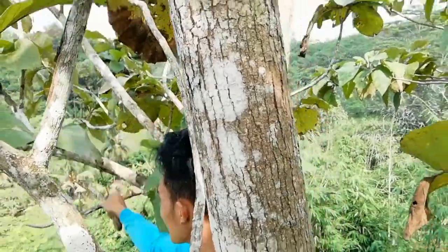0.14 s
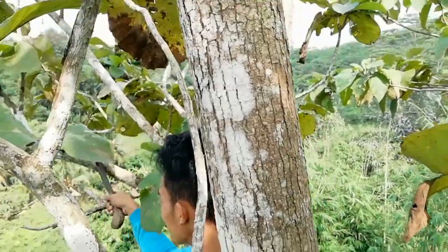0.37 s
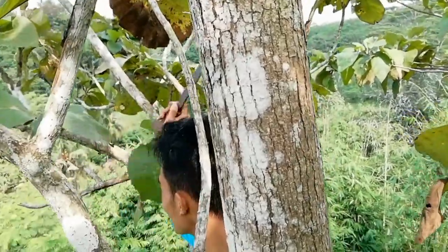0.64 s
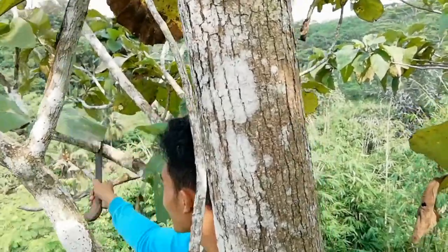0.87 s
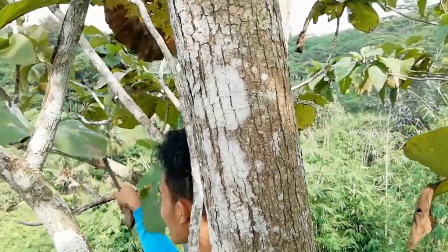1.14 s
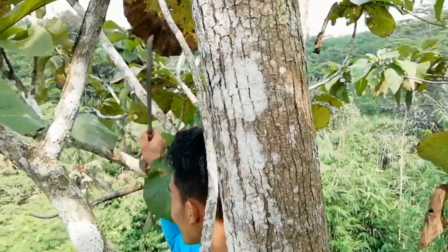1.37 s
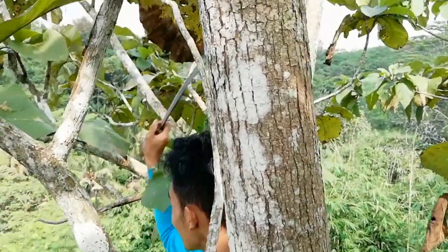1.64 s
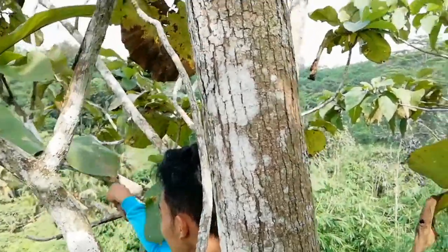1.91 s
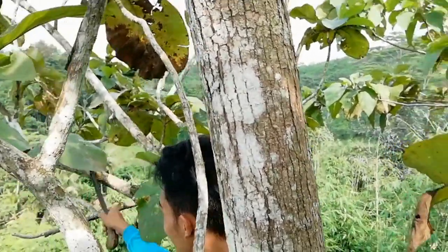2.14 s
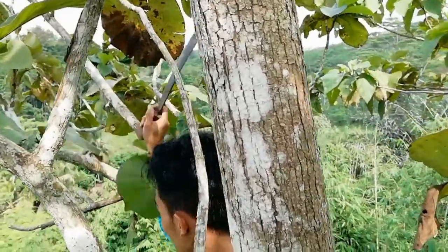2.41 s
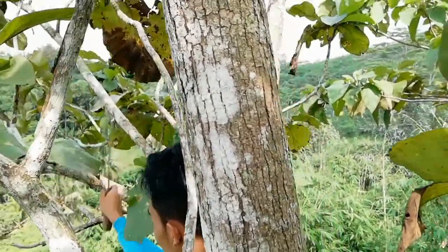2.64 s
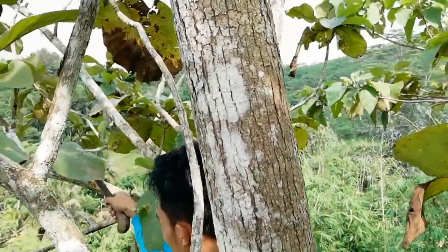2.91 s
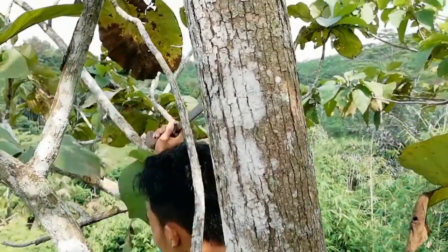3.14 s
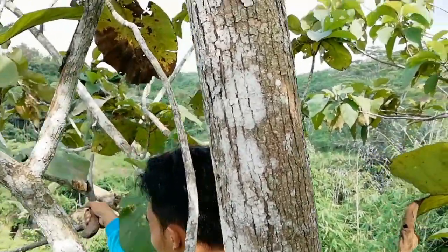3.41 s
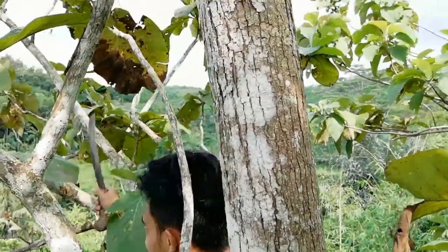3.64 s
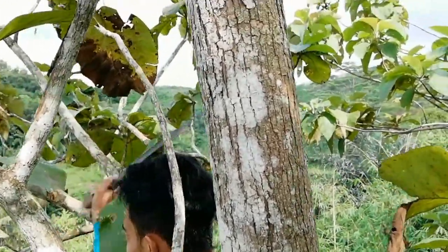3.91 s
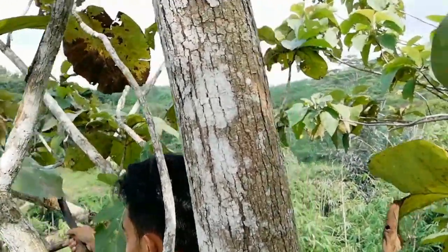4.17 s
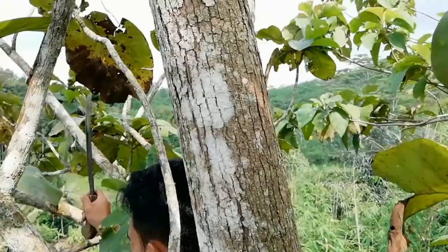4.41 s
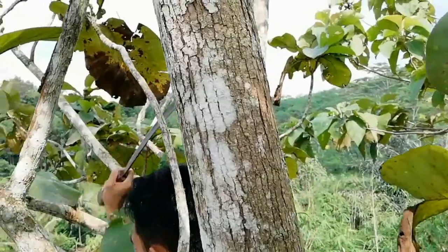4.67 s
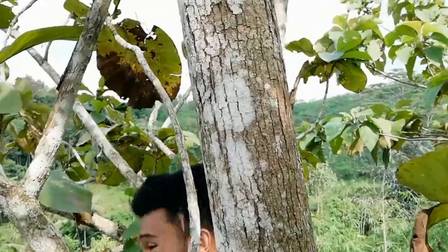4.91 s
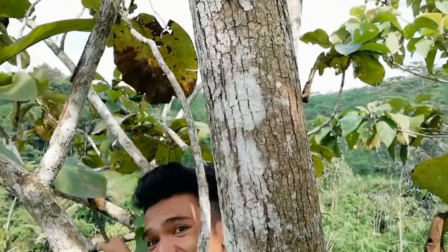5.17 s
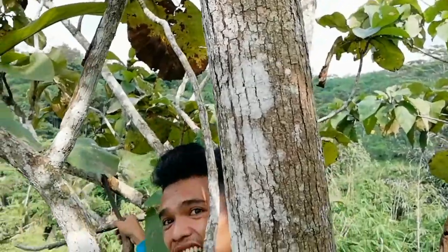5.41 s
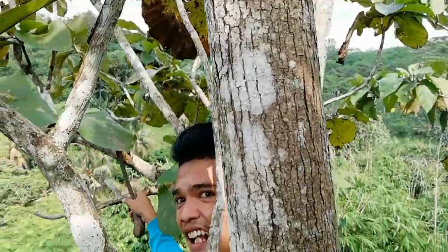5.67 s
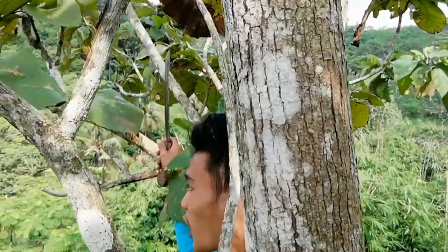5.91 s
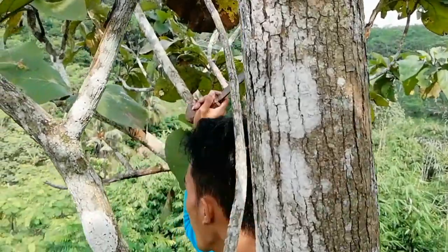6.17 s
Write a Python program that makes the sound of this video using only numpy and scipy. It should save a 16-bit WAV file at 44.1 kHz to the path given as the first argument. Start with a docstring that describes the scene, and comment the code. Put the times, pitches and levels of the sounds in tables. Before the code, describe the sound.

Outdoors beside a tree, a blade chops a thick branch at about 0.24, 0.95, 1.83, 2.79, 3.46, 4.10 and 4.88 s. The first, third and last are the fullest, with a hard woody crack and a short hollow ring; the second, fifth and sixth are thinner, drier and more splintery, the fourth in between. Every blow shakes the leaves, with a quick rustling shudder, a slower settling and a soft low thud. Twigs snap and leaves brush between them, notably around 0.55, 1.53, 2.38 and 3.40 s. After the last chop come small crackles near 5.2 to 5.5 s and faint ones near 6 s. Throughout, a distant small engine putters low, swelling and fading, beneath quiet air and breeze-stirred leaves. A very high thin insect whine continues with tiny gaps until 6 s, with a few barely audible breathy chirps. Close, dry stereo, peaks clipped.

```python
"""A small engine putters far below, an insect whines very high and leaves stir; then twigs snap and a
blade chops at a thick branch high in a tree. Chops excite damped modes and filtered grain noise;
twigs are pressure pulses with short rings, leaves and wind are coloured noise, the engine is a train
of filtered pulses, and insect and chirps are narrowband tones. Two spaced microphones set the image."""
import sys
import numpy as np
from scipy import signal
from scipy.fft import rfft, irfft
from scipy.io import wavfile
from scipy.ndimage import uniform_filter1d

SR = 44100
rng = np.random.default_rng(int(sys.argv[2]) if len(sys.argv) > 2 else 0)


def transcribe(signal):
    """Save signal, clipped to [-1, 1], as a 16-bit WAV file at the path in sys.argv[1]."""
    frames = np.atleast_2d(signal).T
    limited = np.clip(frames, -1, 1)
    pcm = np.round(limited * 32767).astype(np.int16)
    wavfile.write(sys.argv[1], SR, pcm)


def voltage_ratio(level):
    """Linear amplitude factor for a level in decibels (scalar or array-like)."""
    return 10 ** (np.asarray(level, float) / 20)


N = 277830
T = np.arange(N) / SR  # t/s

# blows, relative levels: (t/s, deep ring/dB, high ring/dB, edge bite/dB, splinter fizz/dB)
CHOPS = [(0.238, 6, 1.5, -18, -6.5), (0.954, -14.5, -8.5, -3.5, -1), (1.834, 6.5, 3, -35, -3),
         (2.79, -2.5, -7.5, -10.5, -1), (3.458, -13, -5, -4, -3.5), (4.098, -9, -3.5, -5, 0),
         (4.884, 3, 2.5, -15, -1)]
# blade brushing through leaves, relative levels: (middle t/s, half length to 1/e/s, knock/dB, scrape/dB, fizz/dB)
BRUSHES = [(0.227, 0.0062, -35, -28, -39), (0.586, 0.026, -38.5, -39, -44), (0.738, 0.016, -57, -42, -51),
           (0.854, 0.017, -50, -37, -41), (0.906, 0.019, -45, -33, -25), (1.364, 0.022, -38.5, -37.5, -39),
           (1.557, 0.033, -35.5, -34, -36), (1.642, 0.063, -43.5, -37, -40), (2.399, 0.018, -37, -38, -46),
           (2.568, 0.034, -48, -47, -44.5), (3.08, 0.023, -41, -37, -38), (3.355, 0.014, -56, -39.5, -35.5),
           (3.375, 0.0056, -34, -35, -23), (3.404, 0.027, -45, -32, -28), (3.998, 0.012, -47, -52, -42),
           (4.048, 0.026, -41.5, -36, -29), (4.412, 0.022, -43.5, -41.5, -43),
           (5.5, 0.042, -52, -40.5, -49.5), (6.154, 0.098, -53, -49.5, -50)]
# twig snaps, relative levels: (t/s, ring f/Hz, woody knock/dB, scrape/dB, leafy fizz/dB)
SNAPS = [(0.092, 775, -44, -58, -75), (0.2223, 1690, -31, -33.5, -17.5), (0.556, 1990, -34, -29.5, -31),
         (0.563, 1830, -27, -27.5, -27.5), (0.709, 1590, -26, -47, -22.5), (0.742, 1170, -51, -40, -39),
         (0.854, 1110, -54, -47, -33.5), (0.884, 1620, -45, -50, -26), (1.19, 802, -65, -42, -21),
         (1.395, 1110, -37.5, -44.5, -38), (1.523, 1560, -23, -25.5, -24.5),
         (1.543, 1490, -19.5, -24.5, -32.5), (1.659, 2100, -28.5, -31, -32), (2.15, 1930, -45, -43, -43),
         (2.376, 2110, -28.5, -27.5, -23), (2.384, 1180, -37, -26, -36), (2.395, 910, -46, -27, -26.5),
         (2.509, 1340, -40.5, -38.5, -42), (2.731, 1940, -35.5, -43, -47), (3.047, 2150, -34, -30.5, -33.5),
         (3.068, 1980, -44, -44, -60), (3.209, 1140, -49.5, -40, -42), (3.376, 1550, -59, -54, -36),
         (3.388, 2100, -55, -43, -26), (3.4, 2160, -38.5, -24, -13), (3.514, 900, -30, -41, -45),
         (3.546, 2070, -37, -28, -25), (3.554, 1300, -39, -28.5, -33), (3.88, 1780, -43, -37, -34.5),
         (3.984, 1130, -46.5, -39, -40), (4.39, 1630, -40, -32, -33.5), (5.145, 1480, -34, -35, -38),
         (5.214, 1520, -47, -41, -50), (5.265, 1500, -35.5, -46, -57), (5.409, 840, -33, -38.5, -42.5),
         (5.443, 770, -32.5, -33, -38), (5.456, 1490, -37.5, -42, -50), (5.968, 727, -49, -39, -45.5)]
# leaves stirring in the breeze: (t/s, level/dB)
LEAVES = [(0, -52.5), (.7, -48), (1.3, -48.5), (2, -50.5), (2.5, -49.5), (3.2, -50), (4.3, -49.5),
          (5.07, -50), (5.74, -53.5), (6.3, -58.5)]
# modes of the branch before each blow's weighting: (f/Hz, relative level/dB, t60/s)
BRANCH = [(120, -20.5, 0.15), (153.6, -12.5, 0.23), (205.4, -12, 0.27), (281, -12, 0.14), (352.8, -5, 0.14),
          (428, -7.5, 0.088), (525, -14, 0.18), (611, 2, 0.048), (769, -6.5, 0.11), (878, -1.5, 0.082),
          (1043, -6, 0.1), (1178, -10.5, 0.17), (1340, 2, 0.033), (1480, -3, 0.063), (1620, 4.5, 0.033),
          (1810, 0.5, 0.038), (2100, -6.5, 0.089), (2405, -2.5, 0.061), (2750, -31, 0.044),
          (2925, -7.5, 0.049)]
# spectrum of a woody knock: (f/Hz, relative level/dB)
KNOCK = [(300, -19), (700, -10), (1000, 1.5), (1600, 1), (2500, -5), (3500, -32)]
# spectrum of a scrape: (f/Hz, relative level/dB)
SCRAPE = [(1500, -31), (2500, 8), (4000, 8), (6000, 3.5), (7500, -41)]
# spectrum of leafy or splintery fizz: (f/Hz, relative level/dB)
FIZZ = [(2940, -38), (5000, -3), (6030, -9.5), (7060, -4), (8070, 1), (9010, 1), (10500, 0.5), (14800, -18),
        (15700, -67)]
# spectrum of the lower part of leaf noise: (f/Hz, relative level/dB)
RUSTLE = [(180, -9), (300, -2), (406, -8.5), (850, -7), (1730, -9.5), (3620, -10), (4300, -13),
          (7000, -18.5), (9100, -65), (15400, -120)]
# spectrum of the distant wash: (f/Hz, relative level/dB)
AIR = [(5.9, -51), (10, -9), (54, -9.5), (198, 0.5), (402, -16), (1010, -14), (1180, -23.5), (1610, -19.5),
       (2890, -24), (3470, -36), (3810, -24), (10200, -56), (12600, -35), (13900, -36), (15700, -50)]
# engine speed: (t/s, firing rate f/Hz)
FIRING = [(0, 40.19), (.3, 39.69), (1.4, 40.49), (1.8, 41.67), (2.2, 40.9), (2.7, 41.52), (3.2, 40.91),
          (3.6, 39.74), (4.3, 41.58), (4.7, 41.59), (5.1, 40.95), (5.7, 41.7), (6.3, 42.17)]
# engine, swelling and sinking with the air between: (t/s, level/dB, gain of its upper part/dB)
ENGINE = [(0, -49.5, 20), (.4, -34, 4), (1.2, -39, 7.5), (1.6, -43, 11), (2.1, -42, 4.5),
          (2.35, -35.5, 6.5), (2.75, -34, 2), (3, -40, 8.5), (3.3, -39.5, 4.5), (3.7, -53.5, 17.5),
          (4, -37.5, 4), (4.5, -36.5, 5), (4.85, -35, -9), (5.4, -37, 0), (5.85, -42.5, 4.5), (6.3, -38, 1)]
# spectrum of one exhaust puff: (f/Hz, relative level/dB)
EXHAUST = [(21, -31), (35, -14), (253, 4.5), (342, -1.5), (425, -8), (636, -4.5), (1100, -22), (1430, -44),
           (2420, -120)]
# stretches of insect whine, gliding in pitch: (start t/s, end t/s, start f/Hz, end f/Hz)
WHINE = [(-.1, .59, 13955, 13780), (.61, .77, 13600, 13660), (.79, 1.57, 13790, 14020),
         (1.86, 2.39, 13930, 13830), (2.41, 3.34, 13830, 14050), (3.44, 4.34, 14000, 13800),
         (4.37, 5.34, 13840, 14050), (5.42, 6.01, 14020, 13900)]
# faint breathy chirps: (start t/s, end t/s, start f/Hz, end f/Hz, level/dB)
SQUEAKS = [(0.585, 0.72, 2740, 3020, -47), (1.42, 1.5, 4260, 4400, -50), (1.695, 1.775, 5380, 5080, -48),
           (6.256, 6.294, 4600, 4530, -51)]
# balance of the microphones: (f/Hz, left over right level/dB)
TILT = [(60, -6), (110, 2.5), (200, -1.5), (380, 2.5), (700, 4), (1290, 3), (2380, 3), (4400, 1.5),
        (8120, 3.5), (15000, 16.5)]
# coherence of the microphones: (f/Hz, share common to both sides)
LIKENESS = [(60, 1), (250, 0.99), (500, 0.96), (1000, 0.53), (2500, 0.22), (6000, 0.16), (12000, 0.28)]
# delay of the right side for sounds in the tree: (f/Hz, lag/s)
NEAR_LAG = [(200, 0.00034), (600, 0.00038), (1200, 0.000073), (2500, 0.00015), (15000, 0.000062)]
# delay of the right side for foliage and valley: (f/Hz, lag/s)
VALLEY_LAG = [(100, 0.00073), (15000, 0.000518)]

AIR_DB, THUD_DB = -41.5, -26.5
SHAKE_DB, SHAKE_PER_DEEP = -27.5, 0.11  # dB, dB per dB: a square blow shakes the crown harder
BITE_RISE_S = .0006
# dB, dB per dB, s: a glancing blow sets the nearby leaves fluttering just after
SETTLE_DB, SETTLE_PER_BITE, SETTLE_S = -37, 0.19, 0.083
STIR_LOW_DB, SETTLE_LOW_DB = 3.5, -1  # lower rustle against the fizz
TRAIL_DB, TRAIL_PER_BRIGHTNESS = -2.5, -0.33  # dB, dB per dB: woody snaps trail more crackle than leafy ones
INSECT_DB, INSECT_WAVER_DB, INSECT_EDGE_S = -58, 2.2, 0.046
SQUEAK_BLUR = .035  # bandwidth as a share of starting pitch


def evened(x):
    """Normalisation: a signal is divided by its rms."""
    return x / np.sqrt(np.mean(x ** 2) + 1e-20)


def read(points, hz):
    """Interpolation of a spectrum along a logarithmic frequency axis."""
    f, value = np.transpose(points)
    return np.interp(np.log(hz + 1), np.log(f + 1), value)


def colour(x, points):
    """Minimum-phase filtering: a causal response of unit energy imposes the given spectrum."""
    gain_db = np.maximum(read(points, abs(np.fft.fftfreq(8192, 1 / SR))), -90)
    log_gain = np.log(voltage_ratio(gain_db))
    # the Hilbert transform of log gain gives the minimum phase
    taps = np.fft.ifft(np.exp(np.conj(signal.hilbert(log_gain)))).real[:4096]
    taps = taps / np.linalg.norm(taps)
    return signal.oaconvolve(x, taps[None], axes=1)[:, :N]


def grains(per_s, spread_db):
    """Granular noise: tiny random snaps of uneven size over a hiss modulate two unrelated noises."""
    struck = rng.random((2, N)) < per_s / SR
    size = voltage_ratio(spread_db * np.minimum(rng.exponential(1, (2, N)), 4))
    snaps = signal.lfilter([1], [1, -.93], (struck * size).sum(0))
    return evened((snaps + 1.45 * snaps.mean()) * rng.standard_normal((2, N)))


def bursts(rows):
    """Exponential rise and decay, superposed from rows (t/s, level/dB, rise/s, t60/s)."""
    env = np.zeros(N)
    for s, db, rise, t60 in rows:
        part = env[round(s * SR):][:SR]  # a view into env
        t = T[:len(part)]
        decay = voltage_ratio(db - 60 * t / max(t60, .004))
        part += decay * (1 - np.exp(-t / max(rise, 1e-4)))
    return env


def whistle(hz, width_hz, steady=0):
    """Narrowband noise: a carrier modulated by lowpassed complex noise plus a steady core."""
    r = np.exp(-np.pi * width_hz / SR)
    noise = rng.standard_normal((2, N)) + 1j * rng.standard_normal((2, N))
    envelope = signal.lfilter([1], [1, -r], noise)
    envelope = envelope / envelope.real.std() + steady
    carrier = np.exp(2j * np.pi * np.cumsum(hz) / SR)
    return evened((envelope * carrier).real)


def engine():
    """Pulse excitation: each firing is a filtered puff of uneven strength, with a duller echo from the slope."""
    turns = np.cumsum(np.interp(T, *np.transpose(FIRING))) / SR + .31
    fired = np.flatnonzero(np.diff(np.floor(turns)))
    chance = rng.standard_normal((len(fired), 3))
    puffs = np.zeros((2, N + SR))
    jitter = (3 * chance[:, 0]).astype(int)  # samples
    puffs[0, fired + jitter] = voltage_ratio(1.5 * chance[:, 1])
    puffs[1, fired + round(.011 * SR)] = -.3 * voltage_ratio(0.8 * chance[:, 2])
    direct, echo = colour(puffs[:, :N], EXHAUST)
    s, level, bright = np.transpose(ENGINE)
    dull = signal.butter(2, 380, fs=SR)
    low = signal.filtfilt(*dull, direct)
    high = (direct - low) * voltage_ratio(np.interp(T, s, bright))
    sound = low + high + signal.lfilter(*dull, echo)
    return voltage_ratio(np.interp(T, s, level)) * evened(sound) * [[1], [.3]]


def insect():
    """Stridulation of a wing file: a strong high partial, weak neighbours and a partial two octaves down."""
    start, end, hz0, hz1 = np.transpose(WHINE)
    hz = np.interp(T, np.ravel([start, end], 'F'), np.ravel([hz0, hz1], 'F'))
    to_edge = np.minimum(T - start[:, None], end[:, None] - T)
    on = np.clip(to_edge / INSECT_EDGE_S, 0, 1).sum(0)
    waver = evened(uniform_filter1d(uniform_filter1d(rng.standard_normal(N), 3000), 3000))
    whine = whistle(hz, 20, steady=1.5)
    whine += voltage_ratio(-12) * whistle(hz * 41 / 40, 20)
    whine += voltage_ratio(-17) * whistle(hz * 39 / 40, 30)
    whine += voltage_ratio(-2.5) * whistle(hz / 4, 23, steady=2.8)
    return voltage_ratio(INSECT_DB + INSECT_WAVER_DB * waver) * on * whine


def leaves():
    """Superposed tiny contacts: leaves crackle in the breeze, and a flutter swells and dies after each blow."""
    breeze, settle = voltage_ratio(np.interp(T, *np.transpose(LEAVES))), 0
    for s, _, _, bite, _ in CHOPS:
        u = np.maximum(T - s, 0) / SETTLE_S
        swell = (u * np.exp(1 - u)) ** 2  # peaks at 1 after SETTLE_S
        settle = settle + voltage_ratio(SETTLE_DB + SETTLE_PER_BITE * bite) * swell
    fine = grains(1600, 1.6)
    low = breeze * voltage_ratio(STIR_LOW_DB) + settle * voltage_ratio(SETTLE_LOW_DB)
    return colour(fine * (breeze + settle), FIZZ) + colour(fine * low, RUSTLE)


def air():
    """Broadband turbulence: the distant wash of wind and valley is coloured noise, gently patchy."""
    swell = evened(uniform_filter1d(rng.standard_normal(N), 6000))
    return voltage_ratio(AIR_DB + 0.31 * swell) * colour(rng.standard_normal((2, N)), AIR)


def crackles():
    """Sudden release of strain: a twig snaps, rings and trails a crackle; brushed leaves swell and fade."""
    s, hz, knock, scrape, fizz = np.transpose(SNAPS)
    fuzz, hiss = grains(2200, 5.1), rng.standard_normal((2, N))
    out, one = 0, np.ones(len(s))
    breaks = (s * SR).astype(int)
    trail = TRAIL_DB + TRAIL_PER_BRIGHTNESS * np.clip(fizz - knock, -10, 20)
    for k, (db, shape) in enumerate([(knock - 4, KNOCK), (scrape, SCRAPE), (fizz, FIZZ)]):
        snap = hiss * bursts(zip(s, db + 7.0, 0 * one, 0.012 * one))
        snap[:, breaks] += voltage_ratio(db + 12)  # the break itself: a one-sample pressure pulse
        tail = bursts(zip(s, db + trail + 3.0, 0.0017 * one, 0.09 * one))
        swells = sum(voltage_ratio(row[2 + k]) * np.exp(-((T - row[0]) / row[1]) ** 2) for row in BRUSHES)
        out = out + colour(snap + fuzz * (tail + swells), shape)
    t = T[:3000]
    for at, pitch, db in zip(breaks, hz, knock):
        # two close bending modes of the twig
        ring = np.sin(2 * np.pi * pitch * t) + 0.21 * np.sin(2 * np.pi * 1.3 * pitch * t)
        out[:, at:at + len(t)] += voltage_ratio(db + 6 - 60 * t / .021) * ring
    return out


def chops():
    """Impact and modal response: the edge cracks, the branch rings a moment later, the crown shakes and thuds."""
    s, deep, ring, bite, fizz = np.transpose(CHOPS)
    shake = SHAKE_DB + SHAKE_PER_DEEP * deep
    s, one, snaps = s - .0006, np.ones(len(s)), grains(3200, 1)
    out = colour(snaps * bursts(zip(s, bite, BITE_RISE_S * one, 0.051 * one)), SCRAPE)
    out += colour(snaps * bursts(zip(s, fizz, BITE_RISE_S * one, 0.026 * one)), FIZZ)

    # the shaken crown: a quick shudder, then a slow settling, in uneven lumps
    shudder = bursts(zip(s, shake + 9, 0.0047 * one, 0.14 * one))
    settling = bursts(zip(s, shake, 0.016 * one, 0.65 * one))
    unevenness = [evened(uniform_filter1d(rng.standard_normal(N), 900)) for _ in range(2)]
    lumps = voltage_ratio(2.2 * np.array(unevenness))
    foliage = (shudder + settling) * grains(900, 2.2)
    out += colour(foliage * lumps[0], RUSTLE) + voltage_ratio(-4.5) * colour(foliage * lumps[1], FIZZ)

    hz, db, t60 = np.transpose(BRANCH)[:, :, None]
    t = T[:SR // 2]
    chance = rng.standard_normal((len(s), 3, 2, len(BRANCH), 1))
    for k, (strength, shift, phase) in enumerate(chance):
        # the modes vary a little at random from blow to blow; low ones build up more slowly
        balance = np.interp(np.log(hz), np.log([400, 1000]), [deep[k], ring[k]])
        weight = balance + db + 1.8 * strength
        turns = hz * (1 + .014 * shift) * t + phase
        envelope = voltage_ratio(weight - 12.5 - 60 * t / t60) * (1 - np.exp(-t * hz / 0.34))
        modes = envelope * np.sin(2 * np.pi * turns)
        part = out[:, round((s[k] + .0008) * SR):][:, :len(t)]  # a view into out
        part += modes.sum(1)[:, :part.shape[1]]
    thud = bursts(zip(s + 0.035, THUD_DB * one, 0.054 * one, 0.3 * one))
    return out + thud * whistle(np.full(N, 82.), 28)


def squeaks():
    """Noise-modulated tones: short thin whistles, blurred and breathy."""
    out = np.zeros((2, N))
    for start, end, hz0, hz1, db in SQUEAKS:
        window = np.sin(np.pi * np.clip((T - start) / (end - start), 0, 1)) ** .5
        pitch = np.interp(T, [start, end], [hz0, hz1])
        out += voltage_ratio(db) * window * whistle(pitch, SQUEAK_BLUR * hz0, steady=0.56)
    return out


def pair(rows, lag):
    """Partial coherence: row 0 reaches both microphones, the right one later; row 1 only the right."""
    hz = np.fft.rfftfreq(N, 1 / SR)
    same, tilt = np.clip(read(LIKENESS, hz), 0, 1), voltage_ratio(read(TILT, hz) / 2)
    first, other = rfft(rows, axis=1)
    delayed = first * np.exp(-2j * np.pi * hz * read(lag, hz))
    right = same * delayed + np.sqrt(1 - same ** 2) * other
    return irfft(np.array([first * tilt, right / tilt]), N, axis=1)


def scene():
    """Superposition: tree sounds come from ahead, bending round the trunk in the bass; the rest from the left."""
    valley = engine() + insect() + leaves() + air()
    near = crackles() + chops() + squeaks()
    return pair(near, NEAR_LAG) + pair(valley, VALLEY_LAG)


def top_cut(x):
    """Nothing passes above the cut-off."""
    return signal.sosfilt(signal.butter(12, 15840, fs=SR, output="sos"), x)


def record(dry):
    """Amplitude limiting: peaks of the blows that overload the converter are cut off at full scale."""
    mix = np.clip(dry, -1, 1)
    return top_cut(mix)


dry = scene()
out = record(dry)
transcribe(out)
```